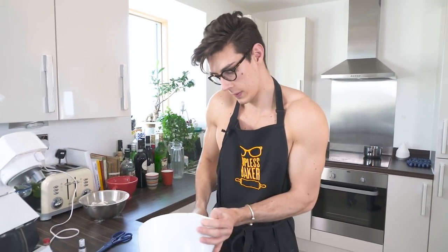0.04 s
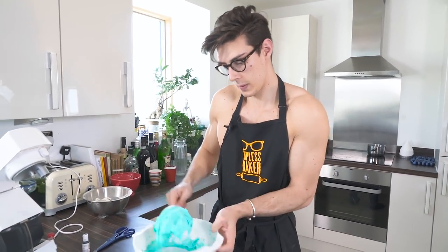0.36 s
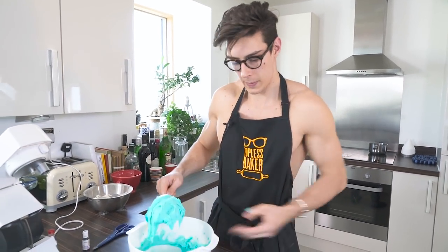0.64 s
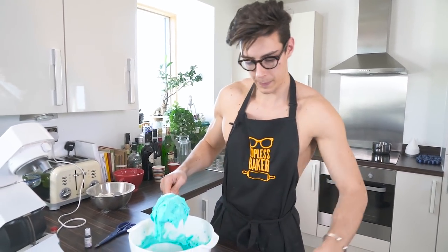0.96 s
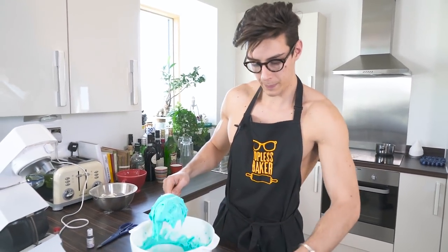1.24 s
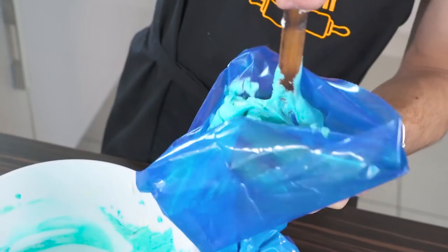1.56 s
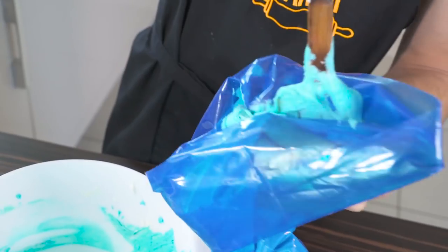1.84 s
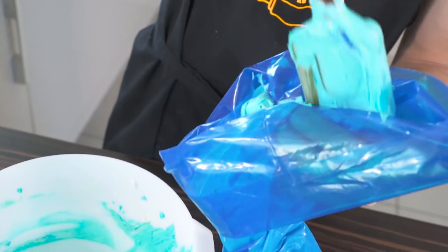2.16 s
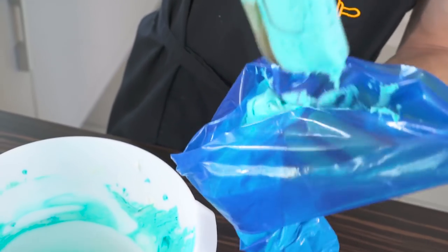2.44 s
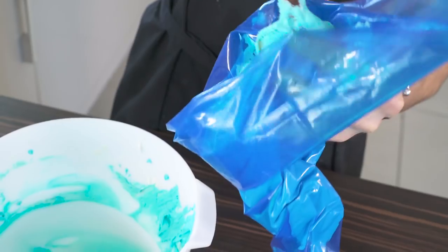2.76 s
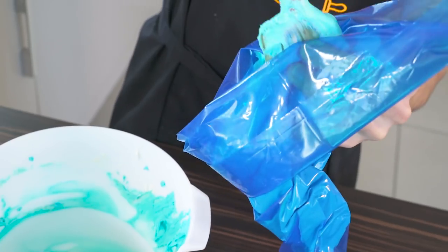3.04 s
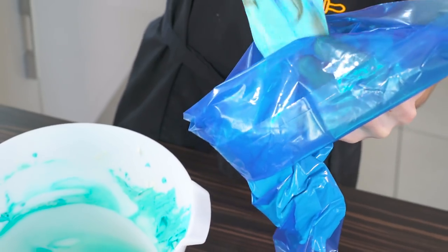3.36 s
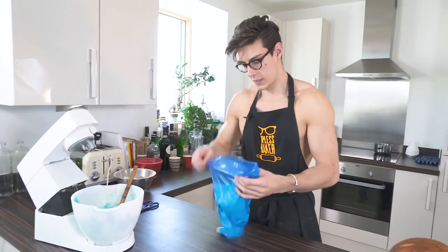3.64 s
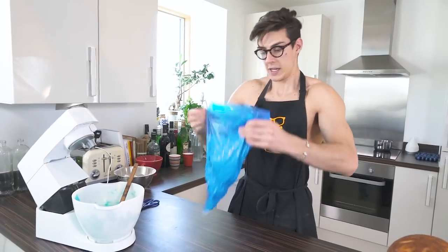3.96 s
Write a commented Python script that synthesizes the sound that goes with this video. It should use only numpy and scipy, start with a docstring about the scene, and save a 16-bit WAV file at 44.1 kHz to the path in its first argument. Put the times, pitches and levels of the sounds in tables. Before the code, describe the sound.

A plastic bowl judders across a kitchen worktop, then a thin plastic piping bag rustles, crinkles and is shaken open.

```python
"""A plastic mixing bowl is dragged over a kitchen worktop: stick-slip rings it, and it judders to rest.
Buttercream is wiped off a spatula into a thin plastic piping bag: the sliding film rustles, its
creases buckle with a snap and its panels flap. Then the bag is abruptly shaken open, crackling
and flapping. A small, hard kitchen rings behind it all, over quiet room tone."""
import sys
import numpy as np
from scipy import signal
from scipy.fft import rfft, irfft
from scipy.io import wavfile

SR = 44100
rng = np.random.default_rng(int(sys.argv[2]) if len(sys.argv) > 2 else 0)


def materialize(psi):
    """Save the field psi as 16-bit PCM at rate SR to the path in sys.argv[1].

    A 1-D psi becomes a single channel; in a 2-D psi each row is a channel.
    """
    bounded = np.clip(np.atleast_2d(psi).T, -1, 1)
    quanta = np.round(bounded * 32767).astype(np.int16)
    wavfile.write(sys.argv[1], SR, quanta)


N = 176576
TIME = np.arange(N) / SR

# the bowl's modes on the worktop, before the hand damps them: pitch_hz, level_db, t60_s
BOWL_MODES = [(126, -1, .26), (180, -5, .12), (279, -2, .14), (362, -5, .08), (423, -4, .07), (481, 0, .15),
              (510, -2, .09), (596, -6, .09), (683, -5, .08), (820, -4, .06), (955, -7, .06),
              (1243, -11, .06)]


def amp(db):
    """Decibels to gain."""
    return 10 ** (np.asarray(db) / 20)


def unit(x):
    """Scales to rms 1."""
    return x / np.sqrt(np.mean(x ** 2) + 1e-20)


def burst(x, samples=132):
    """Scales a short sound to the energy of that many samples at rms 1."""
    return x * np.sqrt(samples / (np.sum(x ** 2) + 1e-20))


def read(points, hz):
    """Reads a table along a log-frequency axis."""
    freq_hz, value = np.transpose(points)
    return np.interp(np.log(hz + 1), np.log(freq_hz + 1), value)


def fade(t, t60):
    """Falls by 60 dB in t60 seconds."""
    return np.exp(-np.log(1000) * t / t60)


def add(mix, start_s, sound):
    """Mixes a sound in at start_s."""
    part = mix[max(round(start_s * SR), 0):][:len(sound)]
    part += sound[:len(part)]


def colour(x, spectrum, size=4096):
    """Minimum-phase EQ through (freq_hz, level_db) points, so clicks keep their sharp front."""
    cepstrum = irfft(np.log(amp(read(spectrum, np.fft.rfftfreq(size, 1 / SR)))))
    cepstrum[1:size // 2] *= 2
    cepstrum[size // 2 + 1:] = 0
    impulse = irfft(np.exp(rfft(cepstrum)))[:size // 2]
    return signal.fftconvolve(x, impulse)[:len(x)]


def noise(spectrum, samples=N):
    """Coloured noise at rms 1."""
    return unit(colour(rng.standard_normal(samples), spectrum))


def ticks(per_s, spread_db):
    """Sharp clicks at random moments, a few much larger than the rest."""
    size = amp(spread_db * np.minimum(rng.exponential(1, N), 3.5)) * rng.choice([-1, 1], N)
    return size * (rng.random(N) < per_s / SR)


def drive(mode_hz, contact_hz, reach_octaves=0.7):
    """A contact excites best the modes near its own pitch."""
    return 1 / (1 + (np.log2(mode_hz / contact_hz) / reach_octaves) ** 2)


def follow(time_s, level_db):
    """Gain along a level curve, dying quickly outside it."""
    outside_s = np.maximum(np.maximum(time_s[0] - TIME, TIME - time_s[-1]), 0)
    return amp(np.interp(TIME, time_s, level_db)) * fade(outside_s, t60=0.12)


def bowl_drag(damping=1.37):
    """Fine stick-slip rings the bowl's modes, higher as it speeds up; its foot rasps and hisses."""
    # a nudge, then one long push: time_s, rumble_db, contact_hz, rasp_db, hiss_db
    push = [(0, -32, 149, -44, -59.5), (.06, -38.5, 133, -49, -58), (.13, -61, 129, -52, -72.5),
            (0.216, -31, 167, -49, -62), (.28, -27, 435, -45.5, -59), (.37, -28, 473, -36.5, -67),
            (.45, -31.5, 180, -43, -59), (0.581, -26, 303, -40.5, -50.5), (.68, -16.5, 544, -38, -62.5),
            (.8, -27, 550, -48.5, -68), (.91, -47, 480, -61, -77)]
    # the foot's gritty rasp: freq_hz, level_db
    rasp_eq = [(500, -36), (900, -2.5), (1300, 0), (1850, 9.5), (2500, -1.5), (3300, -2), (4500, -18),
               (8000, -27.5), (15000, -68.5)]
    # its sliding hiss: freq_hz, level_db
    hiss_eq = [(2500, -9.5), (4500, 4), (6500, -1), (8500, -9), (11000, -10), (15000, -24)]
    time_s, rumble_db, contact_hz, rasp_db, hiss_db = np.transpose(push)
    contact_hz = np.interp(TIME, time_s, contact_hz)
    t = np.arange(SR // 3) / SR
    slips = np.diff(unit(ticks(per_s=1500, spread_db=1.1)), prepend=0)  # each a push and a release
    modes, shares = [], []
    for hz, db, t60 in BOWL_MODES:
        ring = np.sin(2 * np.pi * hz * t) * fade(t, t60 / damping) * (1 - np.exp(-t * hz))
        modes.append(unit(signal.oaconvolve(slips, ring)[:N]))
        shares.append(amp(db) * drive(hz, contact_hz))
    rumble = amp(-2.5) * np.multiply(shares, modes).sum(0) / np.linalg.norm(shares, axis=0)
    # the worktop shudders under the load
    shudder = amp(-19) * noise([(12, -8), (32, 0), (70, -6), (120, -2), (200, -18), (900, -60)])
    rasp = amp(-2.5) * unit(colour(ticks(per_s=5000, spread_db=4.3), rasp_eq))
    hiss = amp(-3) * noise(hiss_eq)
    return (follow(time_s, rumble_db) * (rumble + shudder)
            + follow(time_s, rasp_db) * rasp + follow(time_s, hiss_db) * hiss)


def kitchen(send, reflections_per_s=4000, rise_s=0.0063):
    """Dense reflections from cupboards and tiles, each band dying at its own speed."""
    # the room's decay: freq_hz, t60_s
    decay = [(100, 0.5), (480, 0.6), (1200, 0.53), (4000, 0.44), (14000, 0.67)]
    reflections = rng.standard_normal(SR) * (rng.random(SR) < reflections_per_s / SR)
    hz, t, bands = signal.stft(reflections, SR, nperseg=256)
    envelope = fade(t, read(decay, hz)[:, None]) * (1 - np.exp(-t / rise_s))
    _, tail = signal.istft(bands * envelope, SR, nperseg=256)
    return signal.fftconvolve(send, tail / np.linalg.norm(tail))[:N]


def room_tone(level_db=-55):
    """The kitchen's quiet air: a steady, bass-heavy bed."""
    # the air's tone: freq_hz, level_db
    air_eq = [(15, 9.5), (30, -11.5), (55, 7.5), (120, -1.5), (250, -2), (500, -6), (900, -20), (2200, -21),
              (4000, -27.5), (7000, -33.5), (12000, -39), (16000, -49)]
    return amp(level_db) * noise(air_eq)


def bowl_knocks(press_s=0.0011, damping=1.28, detune=0.0051):
    """Soft blows ring the bowl, which the hand damps; its hard rim adds a few short clicks."""
    # the foot catches on the worktop: start_s, level_db, contact_hz
    catches = [(0.437, -26.5, 160), (.473, -19.5, 278), (0.489, -25, 281), (.57, -19, 240),
               (.583, -17.5, 443), (0.595, -17.5, 440), (.629, -19.5, 473), (0.6344, -15.5, 630),
               (.665, -17.5, 480), (0.669, -19, 297), (.714, -23, 600), (.752, -21.5, 532)]
    # the rim clicks: start_s, level_db, peak_hz, treble_db (against the peak)
    rim_clicks = [(.573, -28, 2800, -38), (.577, -30, 2600, -44), (.629, -18, 2200, -62),
                  (.664, -34, 3200, -34)]
    t, out = np.arange(SR // 3) / SR, np.zeros(N)
    mode_hz, mode_db, t60 = np.transpose(BOWL_MODES)[:, :, None]
    for start_s, db, contact_hz in catches:
        # the foot never lands on quite the same spot
        lag, shift = rng.uniform(-1, 1, (2, len(BOWL_MODES), 1))
        phase = 2 * np.pi * (mode_hz * (1 + detune * shift) * t + 0.26 * lag)
        modes = amp(mode_db) * drive(mode_hz, contact_hz) * np.sin(phase)
        ring = (modes * fade(t, t60 / damping)).sum(0) * (1 - np.exp(-t / press_s)) ** 2
        add(out, start_s, amp(db + 1.5) * burst(ring, samples=800))
    for start_s, db, hz, treble_db in rim_clicks:
        rim_eq = [(hz / 3, -20), (hz * .75, -2), (hz, 0), (hz * 1.2, -3), (hz * 1.7, -21),
                  (14000, treble_db)]
        click = colour(rng.standard_normal(len(t)) * fade(t, t60=0.0034), rim_eq)
        add(out, start_s, amp(db) * burst(click))
    return out


def gestures(starts_s, lengths_s, levels_db, attack_s, t60):
    """Gain over time of hand movements: each swells, holds to the end of its length and dies away."""
    power = np.zeros(N)
    for start_s, length_s, db in zip(starts_s, lengths_s, levels_db):
        t = TIME - start_s
        attack = np.clip(t / attack_s, 0, 1)
        release = fade(np.maximum(t - length_s, 0), t60)
        power += (amp(db) * attack * release) ** 2
    return np.sqrt(power)


def crinkles(per_s, spread_db, decay_cycles, pitches=24):
    """Tiny facets of film at many pitches, each clicking at random moments with a random size."""
    t, out = np.arange(SR // 100) / SR, np.zeros(N)
    for hz in np.geomspace(200, 15000, pitches):
        facet = np.sin(2 * np.pi * hz * t) * np.exp(-t * hz / decay_cycles)
        out += signal.oaconvolve(ticks(per_s / pitches, spread_db), burst(facet) * np.sqrt(hz))[:N]
    return unit(out)


def bag_wipe(attack_s=0.028, release_t60=0.44):
    """Film sliding over film: a soft hiss with tiny crinkles in it, and small creases giving way."""
    # strokes of the film against spatula and hand: start_s, length_s, rustle_db, fizz_db
    strokes = [(1.05, 0.058, -53.5, -55.5), (1.09, 0.19, -44, -46), (1.29, .11, -37.5, -59),
               (1.42, .11, -44, -48), (1.55, 0.078, -41, -63), (1.79, 0.15, -44, -73),
               (1.99, 0.1, -71, -59), (2.12, 0.43, -57.5, -67), (2.435, 0.12, -42.5, -55),
               (2.54, 0.052, -38, -66), (2.68, 0.065, -39, -58), (2.82, 0.059, -38, -54),
               (2.95, 0.4, -54, -69), (3.33, 0.18, -53.5, -79)]
    # the body of the rustle: freq_hz, level_db
    rustle_eq = [(60, -9.5), (200, -1), (400, 4.5), (700, 0.5), (1300, 1), (2100, 0), (3200, -5),
                 (4500, -13), (7000, -19), (14000, -54)]
    # the fizz on top: freq_hz, level_db
    fizz_eq = [(3000, -0.5), (6000, -9.5), (8000, -14), (11000, -18), (16000, -27)]
    start_s, length_s, rustle_db, fizz_db = np.transpose(strokes)
    motion = gestures(start_s, length_s, rustle_db, attack_s, release_t60)
    friction = crinkles(per_s=1100, spread_db=0.72, decay_cycles=2.5) + 0.61 * rng.standard_normal(N)
    rustle = motion * unit(colour(friction, rustle_eq))
    fizz = gestures(start_s, length_s, fizz_db, attack_s, release_t60) * noise(fizz_eq)
    creases = small_creases(start_s[0], start_s[-1] + length_s[-1], motion, per_s=36, above_db=4)
    return amp(-2.5) * rustle + amp(-1) * fizz + creases


def snaps(rows, facet_t60=0.008, scatter_t60=0.041, crack_t60=0.005, thud_t60=0.024, sizzle_db=-17):
    """A buckling facet cracks and rings a few cycles; the jolt scatters through the surrounding film."""
    # the bright crack: freq_hz, level_db
    crack_eq = [(1600, -13), (3200, 2.5), (6300, 2.5), (8300, -7), (12000, -15), (16000, -40)]
    scatter_eq = [(200, -1), (700, -6), (1300, 9), (2500, 2.5), (4500, -7.5), (9000, -41), (16000, -62)]
    thud_eq = [(60, -6), (250, -5.5), (650, 14), (1000, -4), (2500, -17)]
    t, out = np.arange(SR // 20) / SR, np.zeros(N)
    crack_envelope = fade(t, crack_t60) + amp(sizzle_db) * fade(t, scatter_t60)
    for start_s, db, hz, crack_db in rows:
        bend = np.sin(2 * np.pi * 0.94 * hz * t) * fade(t, facet_t60)
        overtone = np.sin(2 * np.pi * 1.63 * hz * t) * fade(t, facet_t60 / 2)
        ring = (bend - 0.65 * overtone) * (1 - np.exp(-t * hz * 5))  # takes a moment to give way
        scatter = colour(rng.standard_normal(len(t)) * fade(t, scatter_t60), scatter_eq)
        crack = colour(rng.standard_normal(len(t)) * crack_envelope, crack_eq)
        thud = colour(rng.standard_normal(len(t)) * fade(t, thud_t60), thud_eq)
        snap = (amp(-2.46) * burst(ring) + amp(-5) * burst(scatter)
                + amp(crack_db - 0.7) * burst(crack) + amp(-13) * burst(thud))
        add(out, start_s, amp(db) * snap)
    return out


def small_creases(from_s, to_s, motion, per_s, above_db, spread_db=4.5, pitch_hz=1590, octaves=0.56):
    """Small creases give way at random moments, their level riding on the film's motion."""
    slots_s = np.arange(from_s, to_s, 1 / per_s)
    jitter, size, detune, sharpness = rng.uniform(-1, 1, (len(slots_s), 4)).T
    start_s = slots_s + 2 * jitter / per_s
    motion_db = 20 * np.log10(np.interp(start_s, TIME, motion) + 1e-9)
    level_db = motion_db + above_db + spread_db * size
    facet_hz = pitch_hz * 2 ** (octaves * detune)
    crack_db = -22 + 7 * sharpness
    return snaps(zip(start_s, level_db, facet_hz, crack_db))


def big_creases():
    """The bag's big creases snap through one by one."""
    # buckling facets: start_s, level_db, nominal_pitch_hz, crack_db (against the level)
    buckles = [(1.1695, -31.5, 1770, -6.5), (1.2342, -30.5, 1120, -27), (1.2825, -35, 2260, -17),
               (1.318, -27, 1530, -33), (1.3626, -27.5, 2060, -11.5), (1.3826, -23.5, 1630, -19),
               (1.4303, -29, 2800, -16), (1.5592, -29, 1350, -13), (1.6123, -27.5, 1840, -9),
               (1.6396, -28, 2000, -6), (1.6495, -20.5, 2080, -13), (1.7375, -38.5, 1570, -3),
               (1.817, -17.5, 1640, -25), (1.8237, -30, 2100, -6), (1.8655, -30.5, 1950, -4.5),
               (1.9265, -29.5, 2250, -16), (1.9347, -32, 1500, -33), (2.013, -29, 1990, -8),
               (2.1441, -32.5, 1660, -15), (2.2436, -30, 1930, -13.5), (2.2938, -37, 1740, -28),
               (2.3075, -38.5, 1140, -38), (2.4173, -39, 1600, -24), (2.4524, -36, 2020, -26),
               (2.475, -21, 1300, -14.5), (2.5158, -23.5, 1580, -14.5), (2.5296, -26, 1590, -28),
               (2.5341, -16.5, 1330, -25), (2.561, -33.5, 2070, -6), (2.582, -31, 1310, -29),
               (2.5876, -26.5, 1420, -15), (2.6048, -22.5, 1600, -28), (2.6398, -26.5, 2580, -7.5),
               (2.7253, -41.5, 1920, 2.5), (2.7298, -29, 2140, -10), (2.756, -31, 1700, -14),
               (2.8261, -30.5, 2100, -18), (2.8323, -26.5, 1410, -12), (2.9645, -40.5, 1660, -30),
               (3.0359, -31.5, 2010, -17), (3.039, -34.5, 1900, -14), (3.1336, -26, 1710, -10.5),
               (3.2625, -35.5, 1510, -36), (3.3275, -23.5, 1630, -14), (3.4308, -36, 1200, -30),
               (3.6301, -29.5, 2300, -6.5), (3.6669, -28, 2190, 1), (3.6757, -29, 1750, 8.5),
               (3.679, -27.5, 1930, 3), (3.69, -20.5, 990, -19), (3.697, -14, 2180, -5),
               (3.7243, -22.5, 1610, -26), (3.7422, -27.5, 2690, -7), (3.7668, -28, 2520, -3),
               (3.777, -30, 1880, -9), (3.8458, -24.5, 1450, -17), (3.8634, -25, 1650, -12),
               (3.8767, -22, 1790, -20), (3.9291, -21, 2050, -14), (3.933, -18, 2350, -18),
               (3.9645, -19, 2120, -21)]
    return snaps(buckles)


def bag_flaps(decay_cycles=1.8, flutter=0.55):
    """A large panel pops over: a low, heavily damped push of air."""
    # flapping panels: start_s, level_db, pitch_hz
    panels = [(1.805, -28.5, 248), (2.455, -31.5, 275), (2.605, -31, 212), (3.667, -16.5, 410),
              (3.691, -14.5, 395), (3.719, -12.5, 380), (3.844, -11.5, 364), (3.86, -14.5, 485),
              (3.879, -20.5, 109)]
    t, out = np.arange(SR // 10) / SR, np.zeros(N)
    for start_s, db, hz in panels:
        cycles = hz * t
        wobble = noise([(hz / 4, -16), (hz, 0), (hz * 2, -6), (hz * 8, -40)], len(t))
        envelope = np.exp(-cycles / decay_cycles) * np.minimum(4 * cycles, 1)
        add(out, start_s, amp(db) * (np.sin(2 * np.pi * cycles) + flutter * wobble) * envelope)
    # air slips round the light film, so it radiates no deep bass
    return signal.lfilter(*signal.butter(2, 85, "highpass", fs=SR), out)


def bag_shake():
    """Many creases give way at once as the bag is shaken, over the swish of its film."""
    # shakes that open the bag: start_s, length_s, crackle_db
    shakes = [(3.629, 0.064, -27), (3.666, 0.084, -21.5), (3.836, 0.015, -21.5), (3.925, 0.1, -24.5)]
    # the shaken film's tone: freq_hz, level_db
    crackle_eq = [(47, -36), (80, 4), (112, 1), (237, -11), (378, -2), (441, -3), (839, -6), (1070, -11.5),
                  (1460, -6.5), (3320, -6.5), (4140, -14), (7200, -18.5), (16000, -51)]
    start_s, length_s, crackle_db = np.transpose(shakes)
    motion = gestures(start_s, length_s, crackle_db, attack_s=0.0029, t60=0.53)
    facets = crinkles(per_s=2400, spread_db=3.6, decay_cycles=2.4)
    clicks = 0.35 * unit(ticks(per_s=900, spread_db=3.5))
    swish = 0.35 * rng.standard_normal(N)
    crackle = motion * unit(colour(facets + clicks + swish, crackle_eq))
    creases = small_creases(start_s[0], start_s[-1] + length_s[-1], motion, per_s=50, above_db=1)
    return amp(-4) * crackle + creases


def scene(bowl_send_db=-6.5, bag_send_db=-12, shake_send_db=-5):
    """Bowl and bag in the kitchen, over its quiet air, in mono."""
    bowl = bowl_knocks() + bowl_drag()
    bag = bag_wipe() + big_creases() + bag_flaps()
    shake = bag_shake()
    reverb = kitchen(amp(bowl_send_db) * bowl + amp(bag_send_db) * bag + amp(shake_send_db) * shake)
    return (bowl + bag + shake + reverb + room_tone())[None]


def record(dry, cutoff_hz=16100):
    """A steep low-pass trims the very top of the treble."""
    lowpass = signal.firwin(401, cutoff_hz, window=("kaiser", 9), fs=SR)
    return signal.oaconvolve(dry, lowpass[None], "same")


dry = scene()
out = record(dry)
materialize(out)
```